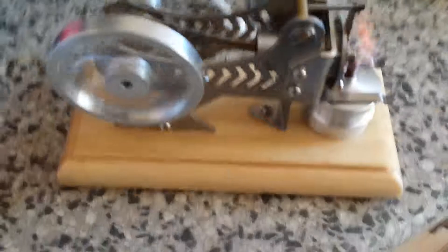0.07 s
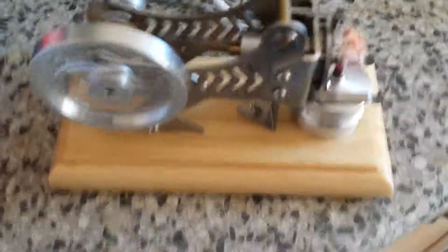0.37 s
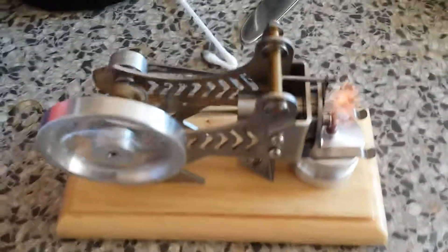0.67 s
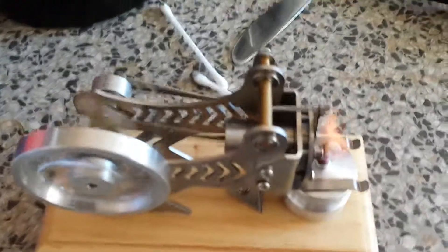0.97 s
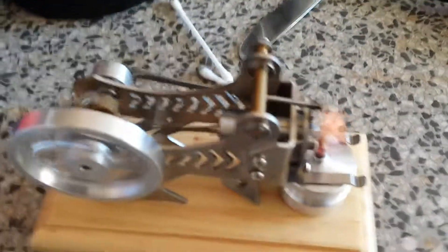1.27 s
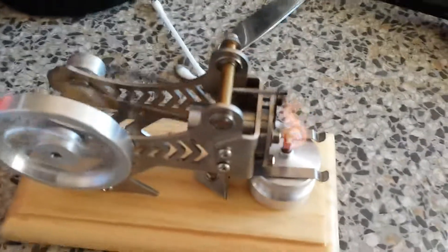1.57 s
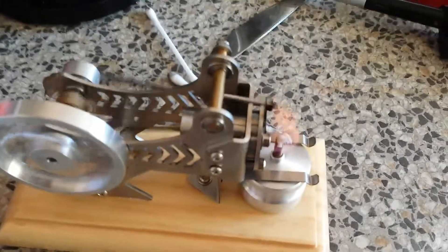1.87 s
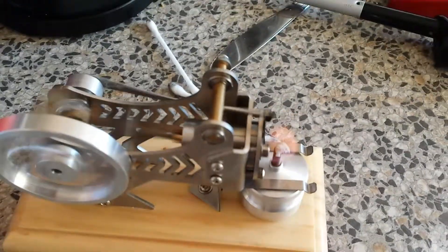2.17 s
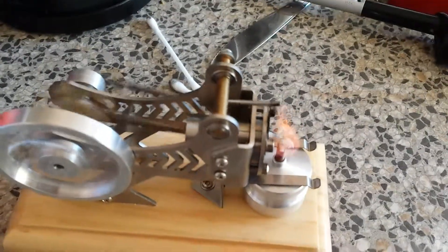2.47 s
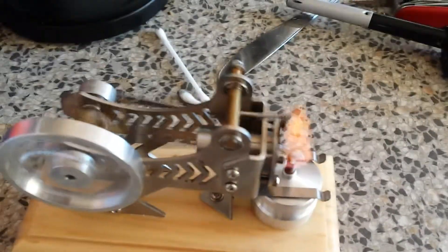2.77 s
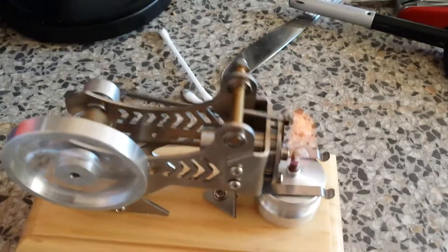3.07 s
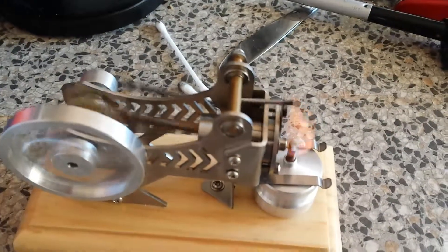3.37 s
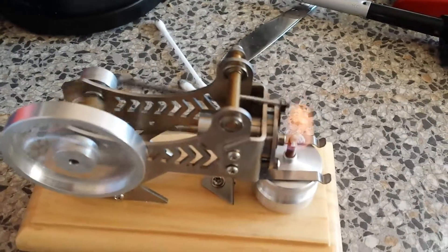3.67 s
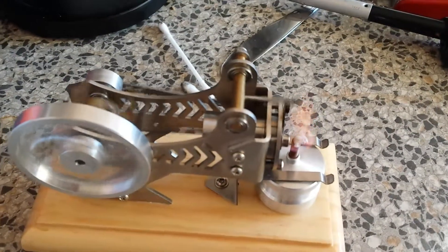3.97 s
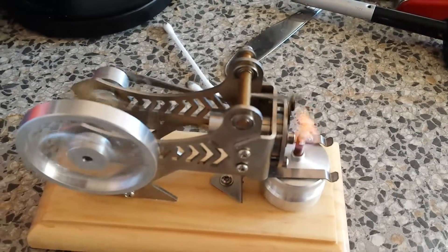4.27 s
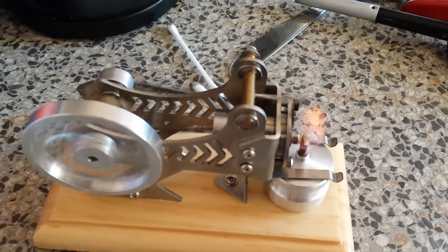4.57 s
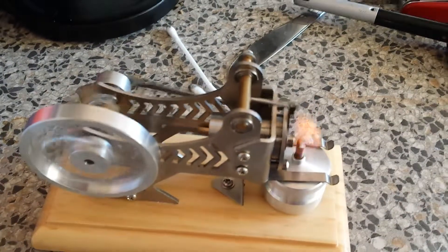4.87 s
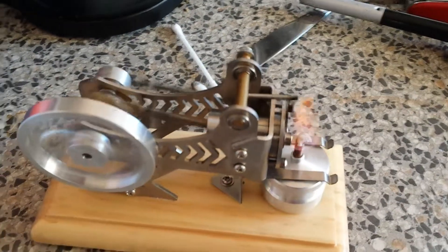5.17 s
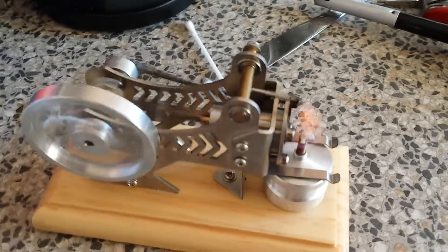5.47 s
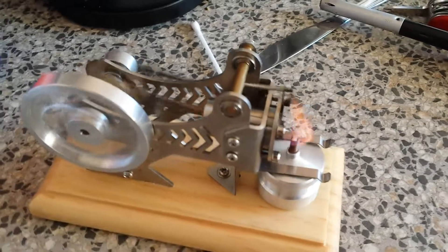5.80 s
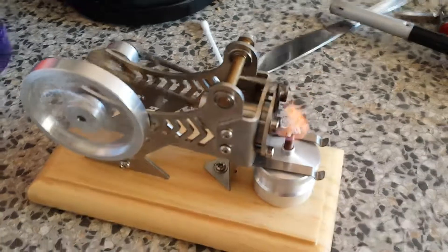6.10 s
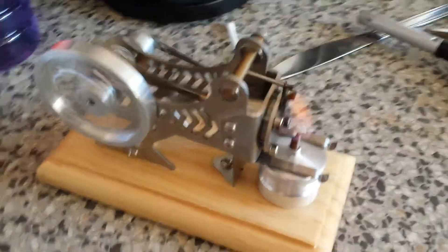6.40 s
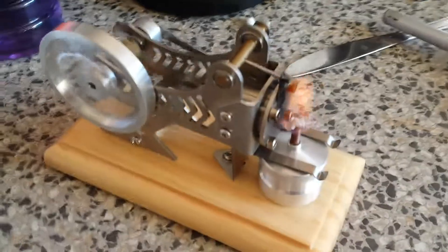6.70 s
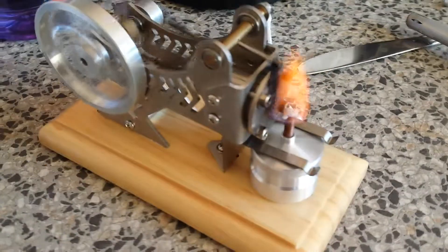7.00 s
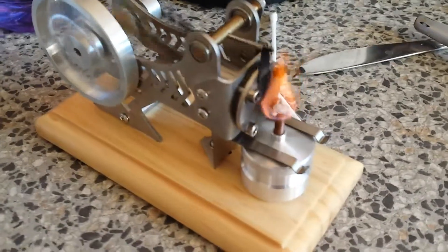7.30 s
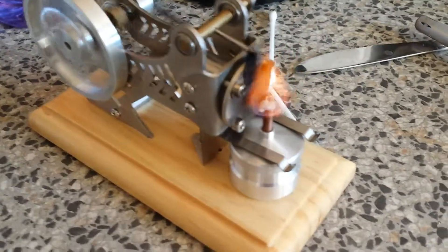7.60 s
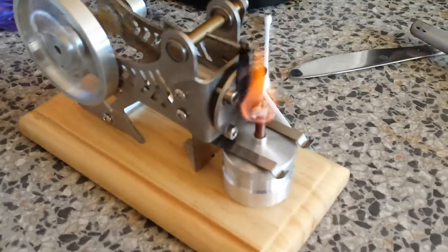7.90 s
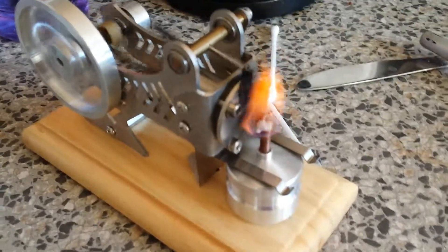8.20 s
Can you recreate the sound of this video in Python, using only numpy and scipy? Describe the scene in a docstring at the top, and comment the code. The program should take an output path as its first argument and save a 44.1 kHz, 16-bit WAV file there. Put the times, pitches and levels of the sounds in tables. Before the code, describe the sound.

A little model engine clatters quickly and regularly on a wooden base on a stone counter, fading in after a silent moment. Sharp metallic valve clacks alternate with the rattle of the rod, over soft wooden thumps, whirring bearings and a pulsing piston hiss. It speeds up and slows a little as it runs on to the end. The microphone is close, and the small room adds a short echo.

```python
"""After a silent moment a small flame-driven model engine fades in, close to a hand-held stereo camera.
It runs at 10 to 13 turns a second on a wooden base on a stone counter. Each turn opens with the valve
clacking shut, ringing the steel frame and knocking the base. In mid-stroke the piston hisses, the
bearings whirr and the base rocks; at two thirds of the turn the linkage rattles back.
Throughout, the base drones and a small room answers."""
import sys
import numpy as np
from scipy import signal
from scipy.fft import rfft, irfft
from scipy.io import wavfile

SR = 44100
rng = np.random.default_rng(int(sys.argv[2]) if len(sys.argv) > 2 else 0)


def file_out(sig):
    """Save sig as 16-bit WAV at sys.argv[1]."""
    # one column per channel
    cols = np.atleast_2d(sig).T
    # limit, then scale
    lim = np.clip(cols, -1, 1)
    pcm = np.round(lim * 32767).astype(np.int16)
    wavfile.write(sys.argv[1], SR, pcm)


N = 372644
TIME_S = np.arange(N) / SR
CRUISE_HZ, RETURN_TURN = 11.6, .664  # reference flywheel speed; point in the turn where the rod returns

# Flywheel speed. Each row: time in seconds, turns a second.
FLYWHEEL_HZ = [(0.48, 11.931), (0.56, 10.685), (2.22, 12.619), (2.51, 12.304), (2.96, 12.747),
               (3.25, 11.333), (3.64, 11.902), (3.91, 10.254), (4.2, 11.69), (4.98, 12.268), (5.73, 10.394),
               (6.16, 11.032), (6.24, 10.082), (6.55, 10.727), (6.83, 10.406), (7.35, 11.929),
               (7.76, 11.393), (8.45, 12.687)]
# How freely the thin side plate sings, struck or rubbed. Each row: time in seconds, relative level in dB.
PLATE_DB = [(1.38, -53), (1.55, -27.5), (2.1, -28.5), (2.8, -33), (3.1, -49.5), (4.0, -54), (5.6, -43),
            (6.7, -39), (7.0, -30.5), (7.6, -34.5), (8.1, -29)]
# How hard the loose parts strike. Each row: time in seconds, then relative levels in dB of
# linkage rattle, rod ring over the rattle, valve rebound.
LOOSE_PARTS_DB = [(0.5, -26.5, 0, -35.5), (1.2, -23.5, 19, -30.5), (1.9, -17.5, 8, -34.5),
                  (3.3, -21, 16.5, -33.5), (4.1, -20, 20, -35), (4.8, -22, 15, -32.5),
                  (5.7, -22, 15.5, -53), (7.0, -21, 14.5, -43), (8.4, -22.5, 9, -44)]


def valve():
    """The valve snaps shut: hard contact, short buzz, one rebound; plate, frame and room ring."""
    # Spectra of contact, rebound and wash in frame and room. Each row: Hz, left and right relative dB.
    contact_spectrum = [(825, -6.5, -53), (1400, -2, -9), (1643, 4.5, -2.5), (1896, -34, -19),
                        (2720, -24, -10.5), (3150, -33, -8.5), (4170, -47, -7), (5505, 4.5, -0.5),
                        (6360, -22, -8.5), (7360, -30, 6), (8300, -8, 4), (8950, -56.5, -5),
                        (9500, -49.5, -13), (10400, -21, -19.5), (14700, -19, -13)]
    rebound_spectrum = [(1630, -14, 0.5), (2680, 2.5, -25), (3440, 10, 14.5), (4220, -1.5, 9),
                        (4960, -23, 1), (9000, -26, -39)]
    wash_spectrum = [(235, -24.5, -31), (524, 4, 0.5), (910, 3, -1.5), (1410, -5.5, -6), (1860, -7, -22),
                     (2470, 2, -5.5), (3350, -8, -13), (4000, -5, -5), (4900, 1.5, -4), (6100, -4.5, 2),
                     (7460, 3.5, 4), (9100, -33, -0.5), (9770, -18, 2), (11400, -36, -5.5),
                     (14600, -69, -28.5)]
    # Side plate resonances. Each row: centre in Hz, width in Hz, left and right relative dB.
    plate_modes = [(5690, 72, 12, 2), (6110, 160, 6.5, -6)]
    # How strongly the clack and its ring sound on the left. Each row: time in seconds, relative dB.
    left_clack_db = [(0.8, -10), (1.3, -25), (1.55, -3), (1.9, -11.5), (2.8, -7.5), (3.8, -6.5), (5.0, -11),
                     (6.0, -1.5), (6.9, -5.5), (8.4, -6.5)]
    # Brighter when the camera faces the valve. Each row: time in seconds, treble tilt in dB an octave.
    facing_tilt = [(.5, 0.5), (2.5, 0), (4.5, -0.5), (6.2, -1), (7.2, 0), (8.4, 0.5)]
    out, t = np.zeros((2, N)), np.arange(SR // 6) / SR
    rebound, plate = colour(rebound_spectrum), irfft(resonances(plate_modes))
    left_lag_s = .00032  # the valve is nearer the right microphone
    for s in passes(0):
        db = driven_db(s, cruise_db=-13.5, db_per_hz=0.79) + 0.84 * rng.standard_normal()
        rebound_db = at(LOOSE_PARTS_DB, s)[2] + 3 * rng.standard_normal()
        tilt_db, = at(facing_tilt, s)
        contact = colour(contact_spectrum, tilt_db + 1.7 * rng.standard_normal())
        contact[0] = np.roll(contact[0], round(left_lag_s * SR))
        left_db, = at(left_clack_db, s)
        direct_pan, diffuse_pan = amp([[left_db + 1.5], [0]]), amp([[0.37 * left_db], [0]])
        snap = chatter(contact, rise_s=0.00082, fall_s=0.0015, grain_db=6.5)
        add(out, s - .01, amp(db + 19) * unit_energy(direct_pan * snap))
        buzz = chatter(contact, rise_s=0.0013, fall_s=0.00076, grain_db=-0.5)
        add(out, s - .008, amp(db + 7) * unit_energy(diffuse_pan * buzz))
        singing = chatter(plate, rise_s=0.00018, fall_s=0.0011, grain_db=5)
        add(out, s - .0105, amp(at(PLATE_DB, s)[0] + 34) * singing)
        add(out, s, amp(db + 12) * diffuse_pan * frame_ring(t, scatter_db=4.5, detune=0.0055))
        # the flap falls back on its seat, peaking about 11 ms after the clack
        reseat = chatter(rebound, rise_s=0.00024, fall_s=0.0035, grain_db=7.5)
        add(out, s + 0.001174 + 0.00076 * rng.standard_normal(), amp(rebound_db + 27.5) * reseat)
        wash = through(room(correlation=0.56), colour(wash_spectrum, tilt_db))
        attack = 1 - np.exp(-np.arange(wash.shape[1]) / SR / 0.00013)
        add(out, s, amp(db + 17) * unit_energy(diffuse_pan * wash * attack))
    return out


def frame_ring(t, scatter_db, detune):
    """The loose steel frame rings with new strengths and slightly new pitches at every blow."""
    # Each row: frequency in Hz, left and right relative dB, t60 in seconds.
    steel_modes = [(2265, -15.5, -20, 0.18), (2650, -16, -32, 0.043), (3410, -12.5, -29, 0.11),
                   (4046, -12.5, -17, 0.1), (5540, -26, -9, 0.042), (7440, -27, -3, 0.047),
                   (8100, -35, -13, 0.052), (10410, -13.5, -7.5, 0.079)]
    hz, left_db, right_db, t60_s = np.transpose(steel_modes)[:, :, None]
    hz = hz * (1 + detune * rng.standard_normal(hz.shape))
    gains = amp(np.array([left_db, right_db]) + scatter_db * rng.standard_normal(hz.shape))
    waves = np.sin(2 * np.pi * (hz * t + rng.random((2, len(hz), 1))))
    return unit_energy(np.sum(gains * amp(-60 * t / t60_s) * waves, axis=1))


def base_knock():
    """Each clack pushes the board once; the counter throws the push back and the wood rings."""
    # Base and stand. Each row: nominal frequency in Hz, relative level in dB, t60 in seconds.
    wood_modes = [(116.5, -43, 0.36), (142, -27, 0.081), (242.6, -27, 0.12), (305, -20, 0.047),
                  (371.7, -20.5, 0.098), (562.8, -15, 0.051), (655, -15.5, 0.028), (756, -21, 0.039),
                  (810, -28.5, 0.15), (861, -29, 0.16), (1071, -29.5, 0.1), (1221, -26, 0.072)]
    # Seating on the counter, which damps the ring. Each row: time in seconds, pitch factor, ring in dB.
    counter_seating = [(1.5, 0.97, 3), (4.6, 1, 4), (5.8, 0.97, 5), (7.15, 0.95, 0), (7.3, 0.97, 6),
                       (8.4, 0.94, 2.5)]
    out, t = np.zeros((2, N)), np.arange(SR // 4) / SR
    hz, mode_db, t60_s = np.transpose(wood_modes)[:, :, None]
    envelope = amp(mode_db - 60 * t / t60_s) * (1 - np.exp(-t / 0.00051))
    for s in passes(0):
        db = driven_db(s, cruise_db=-13.5, db_per_hz=0.42) + 0.53 * rng.standard_normal()
        gain = amp(db) * amp([[-.6], [.6]])
        push_hz = 620 * np.exp(0.11 * rng.standard_normal())
        u = (np.pi * push_hz * (t[:SR // 100] - .003)) ** 2
        push = (2 * u - 1) * np.exp(-u)
        add(out, s - .0024, gain * push)
        add(out, s + 0.0015, gain * amp(-18.5) * push)
        sag, ring_db = at(counter_seating, s)
        pitch_hz = hz * sag * (1 + 0.0019 * rng.standard_normal(hz.shape))
        modes = -np.cos(2 * np.pi * pitch_hz * t) * envelope * amp(1.6 * rng.standard_normal(hz.shape))
        add(out, s + 0.00055, gain * amp(ring_db) * np.sum(modes, axis=0))
    return out


def linkage():
    """The rod slides back and takes up its play: a loose rattle, a bounce, the ring of rod and room."""
    # Each row: frequency in Hz, left and right relative dB.
    contact_spectrum = [(330, -13.5, -26), (766, -2, -3.5), (1460, -0.5, -3), (1683, 2.5, -2.5),
                        (1970, -36, -23), (2130, -7.5, 4.5), (2840, -5, -2), (3180, -3, -2.5),
                        (4350, -10, 2.5), (5600.0, -0.5, 5.5), (7400, -7, 2), (7460, -5.5, 8.5),
                        (9350, -18, -1), (11500, -20, -7), (12700, -20, -5), (15000, -45.5, -12.5)]
    # Each row: centre in Hz, width in Hz, left and right relative dB.
    rod_modes = [(2286, 24, 8.5, -16), (2420, 75, 5, -9), (2720, 43, 10.5, -40)]
    # Gentle returns as the wheel slows. Each row: time in seconds, level change in dB.
    soft_returns = [(3.82, -10), (5.64, -4.5), (6.31, -10), (6.68, -8)]
    out = np.zeros((2, N))
    contact, rod = colour(contact_spectrum), irfft(resonances(rod_modes))
    for s in passes(RETURN_TURN):
        rattle_db, rod_db, _ = at(LOOSE_PARTS_DB, s)
        soft_db = sum(change for when, change in soft_returns if abs(when - s) < .5 / CRUISE_HZ)
        db = rattle_db + soft_db + 1.86 * rng.standard_normal()
        start_s = s + .0008 * rng.standard_normal() - .01
        slide = chatter(contact, rise_s=0.0035, fall_s=.003, grain_db=1)
        add(out, start_s - .005, amp(db + 7) * slide)
        rattle = chatter(contact, rise_s=0.0017, fall_s=0.0014, grain_db=1.5)
        add(out, start_s, amp(db + 20) * rattle)
        bounce = chatter(contact, rise_s=.0016, fall_s=.004, grain_db=2)
        add(out, start_s + .003, amp(db + 12.5 + 2 * rng.standard_normal()) * bounce)
        ringing = chatter(rod, rise_s=.001, fall_s=.0025, grain_db=2)
        add(out, start_s, amp(db + rod_db - 1) * ringing)
        add(out, s, amp(db + 10.5) * unit_energy(through(room(correlation=0.32), contact)))
    return out


def base_rocking():
    """The piston's weight rocks the base: dull thumps at the clack, in mid-stroke and on the way back."""
    # Mid-stroke thump. Each row: time in seconds, level in dB.
    stroke_levels = [(1.6, -43), (2.1, -31.5), (3.03, -30.5), (3.25, -41.5), (8.4, -46)]
    out = np.zeros((2, N))
    for s in passes(0):
        clack_db = driven_db(s, cruise_db=-35, db_per_hz=0.42)
        add(out, s - .029, -amp(clack_db) * thump(pitch_hz=148, width_s=0.0032))
        stroke_db = at(stroke_levels, s)[0] + 1.2 * rng.standard_normal()
        start_s = s + 0.0079 + 0.0024 * rng.standard_normal()
        add(out, start_s, amp(stroke_db) * thump(pitch_hz=120, width_s=0.012))
    for s in passes(RETURN_TURN):
        sway_db = driven_db(s, cruise_db=-42.5, db_per_hz=1.2) + 2 * rng.standard_normal()
        add(out, s - .025, amp(sway_db) * thump(pitch_hz=132, width_s=0.0075))
    return out * amp([[-.6], [.6]])


def friction():
    """Bearings, piston, side plate and guide rub hardest near mid-stroke and hush before the clack."""
    # Each row: frequency in Hz, left and right relative dB.
    bearing_spectrum = [(149, -19, -21), (290, 6.5, 6.5), (590, 1.5, 3.5), (910, 2, -4.5),
                        (1430, -3.5, -6.5), (1910, -7.5, -0.5), (2200, 3.5, -12.5), (3160, -2, 1),
                        (4250, 1, -34), (5520, -17, 4), (9000, -48, -44)]
    piston_spectrum = [(2500, -45, -11), (4780, 10, 9), (5250, -9, -17), (7270, 0, 10.5), (8160, -25, 11.5),
                       (9200, -4, -1.5), (10440, -1, 4.5), (11500, -20, -6), (14400, -59, -6)]
    # Rubbed resonances. Each row: centre in Hz, then width in Hz, left and right dB before sharpening.
    plate_bands = [(5670, 350, 4, -15), (6080, 560, 9, -23)]
    guide_bands = [(5420, 390, 0, -14.5)]
    # The guide's scrape joins in the second half. Each row: time in seconds, level in dB.
    guide_levels = [(4.5, -64), (5.2, -45), (6.2, -41), (6.7, -43)]
    stroke = swing(peak_turn=.4)
    whirr_db = driven_db(TIME_S, cruise_db=-42, db_per_hz=0.87) + 3.6 * stroke
    hiss_db = driven_db(TIME_S, cruise_db=-42.5, db_per_hz=1.6) + 4.7 * stroke
    rasp_db = at(PLATE_DB, TIME_S)[0] + 5.5 * swing(peak_turn=.3) - 8.5
    scrape_db = at(guide_levels, TIME_S)[0] + 0.49 * stroke
    whirr = amp(whirr_db) * rush(bearing_spectrum, correlation=0.7)
    hiss = amp(hiss_db) * rush(piston_spectrum, correlation=0.18)
    return whirr + hiss + amp(rasp_db) * rub(plate_bands) + amp(scrape_db) * rub(guide_bands)


def base_drone():
    """The base drones: low noise that swells once a turn and grows with speed."""
    # Each row: frequency in Hz, left and right relative dB.
    drone_spectrum = [(20, -31, -32), (49.7, -15, -14), (75.3, 2.5, 6), (98, -13, -9), (107, -3, -5),
                      (132, -2, 2), (183, 0, 0), (400, -43, -30)]
    db = driven_db(TIME_S, cruise_db=-51, db_per_hz=2.2) + 3.9 * swing(peak_turn=.6)
    return amp(db) * rush(drone_spectrum, correlation=0.91)


def room(correlation):
    """Diffuse tail of the small room; the high treble dies first."""
    # Each row: frequency in Hz, t60 in seconds.
    decay_times = [(300, 0.13), (1000, 0.13), (3000, 0.17), (7000, 0.074), (13000, 0.06)]
    hz, t, spectra = signal.stft(noise_pair(correlation, SR // 4), SR, nperseg=256)
    decay = amp(-60 * t / at_hz(decay_times, hz).T)
    return unit_energy(signal.istft(spectra * decay, SR, nperseg=256)[1])


def chatter(response, rise_s, fall_s, grain_db):
    """Tiny steel contacts, crowded round 10 ms in, excite an impulse response; energy 1."""
    t = np.arange(SR // 25) / SR - .01
    swell = np.exp(np.minimum(t / rise_s, -t / fall_s))
    contacts = swell * rng.standard_normal(len(t)) * amp(grain_db * rng.standard_normal(len(t)))
    return unit_energy(through(contacts, response))


def thump(pitch_hz, width_s):
    """Soft low push, centred 30 ms in."""
    t = np.arange(3 * SR // 50) / SR - .03
    return np.cos(2 * np.pi * pitch_hz * t) * np.exp(-(t / width_s) ** 2)


def rub(modes):
    """Friction noise of rms 1 in sharpened resonances."""
    gain = np.abs(resonances(modes, N)) ** 1.4
    return unit_rms(irfft(rfft(noise_pair(0.26, N)) * gain, N))


def rush(spectrum, correlation):
    """Steady coloured stereo noise of rms 1."""
    gain = amp(at_hz(spectrum, np.fft.rfftfreq(N, 1 / SR)))
    return unit_rms(irfft(rfft(noise_pair(correlation, N)) * gain, N))


def noise_pair(correlation, size):
    """Two white noises that share a part."""
    common = np.sqrt(correlation) * rng.standard_normal(size)
    return common + np.sqrt(1 - correlation) * rng.standard_normal((2, size))


def flywheel_turns(first_clack_s=.4728):
    """Flywheel angle at each sample, whole whenever the valve shuts."""
    turns = np.cumsum(at(FLYWHEEL_HZ, TIME_S)[0]) / SR
    return turns - np.interp(first_clack_s, TIME_S, turns)


def passes(share):
    """Times in seconds at which the flywheel passes a share of its turn."""
    turns = flywheel_turns()
    return np.interp(np.arange(share, turns[-1]), turns, TIME_S)


def swing(peak_turn):
    """One cosine cycle a turn."""
    return np.cos(2 * np.pi * (flywheel_turns() - peak_turn))


def driven_db(s, cruise_db, db_per_hz):
    """Level of a part at time s, rising with flywheel speed."""
    return cruise_db + db_per_hz * (at(FLYWHEEL_HZ, s)[0] - CRUISE_HZ)


def resonances(modes, size=2048):
    """Stereo frequency response of damped resonances."""
    hz = np.fft.rfftfreq(size, 1 / SR)
    centre_hz, width_hz, left_db, right_db = np.transpose(modes)[:, :, None]
    shapes = 1j * hz * width_hz / (centre_hz ** 2 - hz ** 2 + 1j * hz * width_hz)
    return np.sum(amp(np.array([left_db, right_db])) * shapes, axis=1)


def colour(spectrum, tilt_db=0, size=2048):
    """Minimum-phase stereo impulse response, tilted by tilt_db an octave above 4 kHz."""
    hz = np.fft.rfftfreq(size, 1 / SR)
    octaves = np.log2(np.maximum(hz / 4000, 1))
    cepstrum = irfft(np.log(amp(at_hz(spectrum, hz) + tilt_db * octaves)))
    cepstrum[:, 1:size // 2] *= 2
    cepstrum[:, size // 2 + 1:] = 0
    return unit_energy(irfft(np.exp(rfft(cepstrum))))


def at(rows, s):
    """Each value column of a curve at time s."""
    times, *columns = np.transpose(rows)
    return [np.interp(s, times, c) for c in columns]


def at_hz(rows, hz):
    """Each value column of a spectrum, read on a log axis."""
    row_hz, *columns = np.transpose(rows)
    return np.array([np.interp(np.log(hz + 1), np.log(row_hz), c) for c in columns])


def through(x, response):
    """Convolve along time."""
    return signal.fftconvolve(np.atleast_2d(x), response, axes=1)


def add(track, s, sound):
    """Mix a sound into a stereo track at time s."""
    i = min(N, max(0, round(s * SR)))
    track[:, i:i + sound.shape[-1]] += sound[..., :N - i]


def amp(db):
    """Decibels to gain."""
    return 10 ** (np.asarray(db) / 20)


def unit_rms(x):
    """Scale to rms 1."""
    return x / np.sqrt(np.mean(x ** 2) + 1e-20)


def unit_energy(x):
    """Scale to a mean channel energy of 1."""
    return unit_rms(x) / np.sqrt(x.shape[-1])


def scene():
    """The whole engine."""
    return valve() + base_knock() + base_rocking() + linkage() + friction() + base_drone()


def record(dry):
    """Tall peaks are softly rounded; sub-bass and far treble are dropped; silence, then a fade-in."""
    low_hz, top_hz = 55, 14750
    silent_s, fade_s = .425, 1.5
    rounded = dry / (1 + np.abs(dry / .95) ** 4) ** .25
    hz = np.fft.rfftfreq(N, 1 / SR)
    band = hz / np.hypot(hz, low_hz) / np.sqrt(1 + (hz / top_hz) ** 120)
    fade = np.clip((TIME_S - silent_s) / fade_s, 0, 1) ** 0.71
    return irfft(rfft(rounded) * band, N) * fade


dry = scene()
out = record(dry)
file_out(out)
```